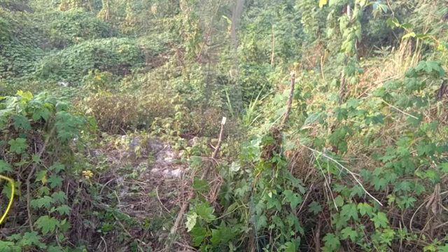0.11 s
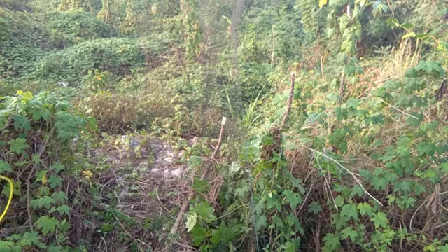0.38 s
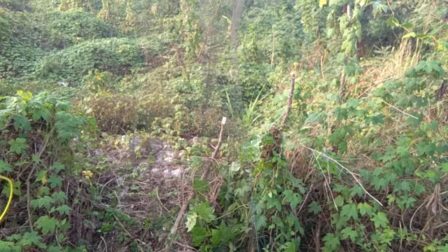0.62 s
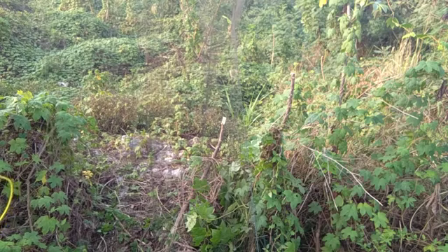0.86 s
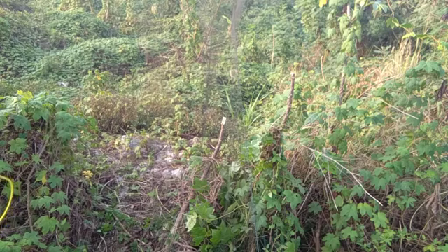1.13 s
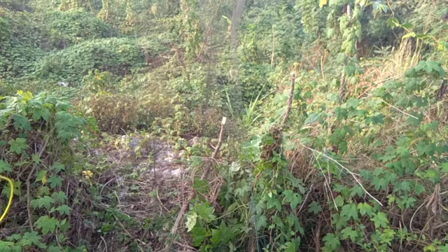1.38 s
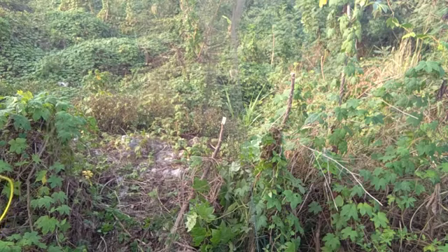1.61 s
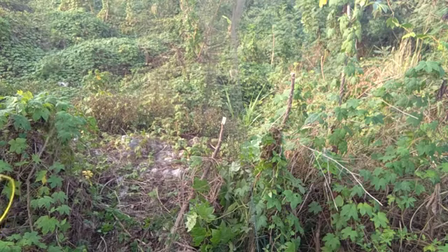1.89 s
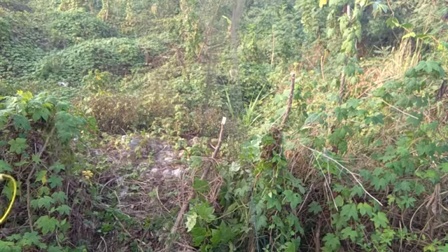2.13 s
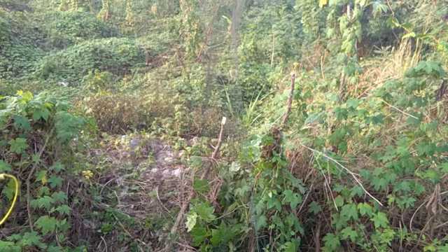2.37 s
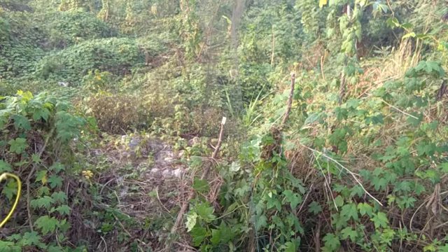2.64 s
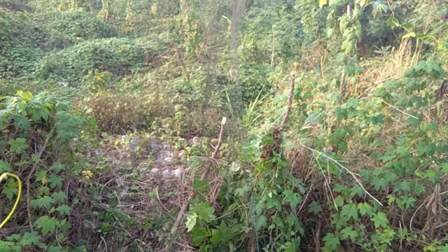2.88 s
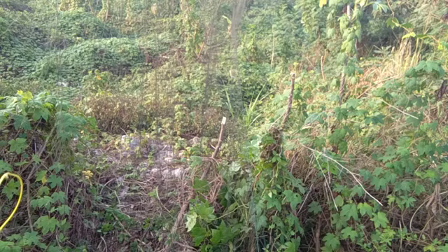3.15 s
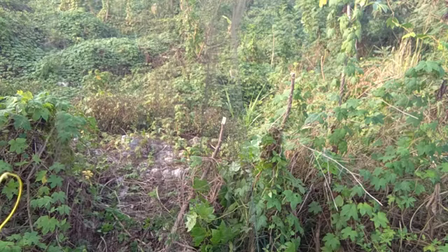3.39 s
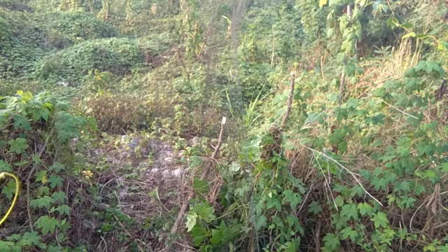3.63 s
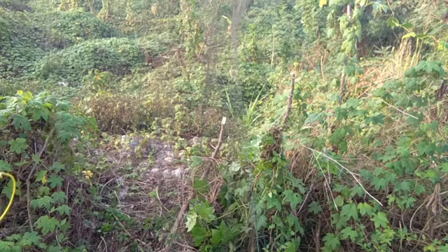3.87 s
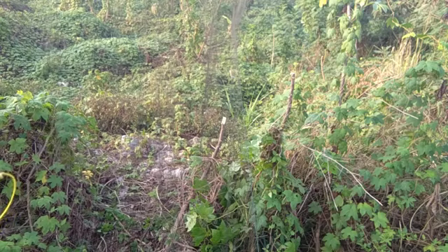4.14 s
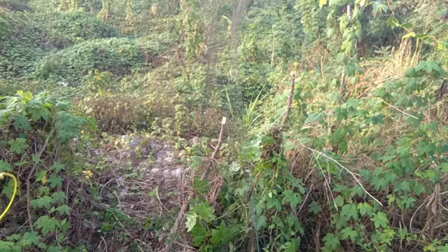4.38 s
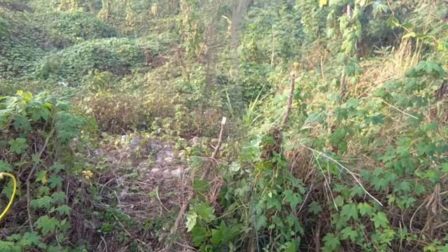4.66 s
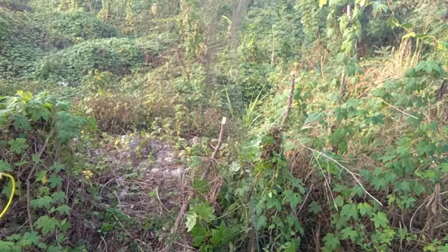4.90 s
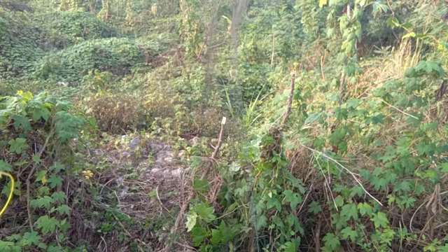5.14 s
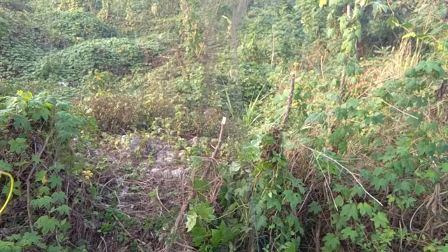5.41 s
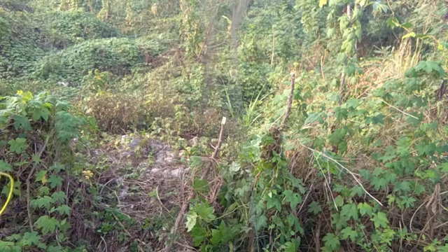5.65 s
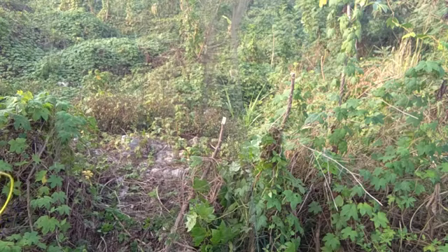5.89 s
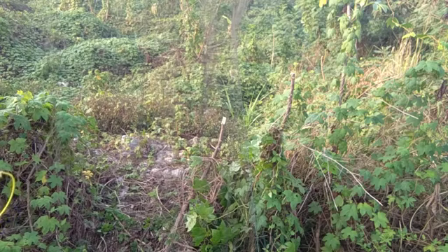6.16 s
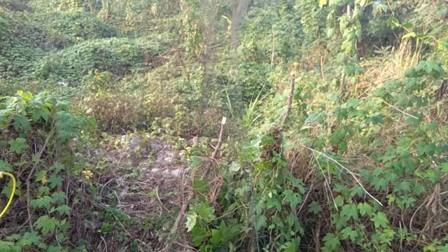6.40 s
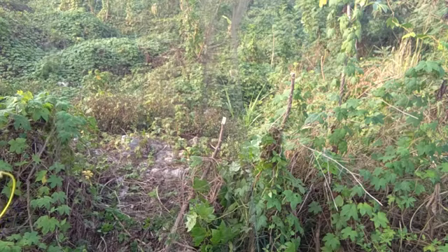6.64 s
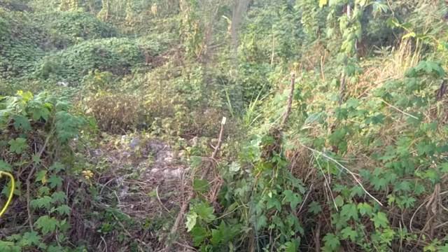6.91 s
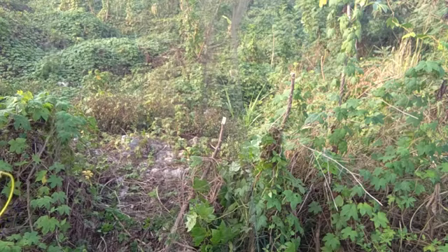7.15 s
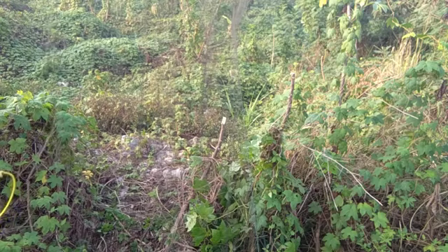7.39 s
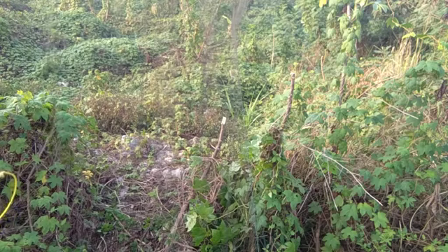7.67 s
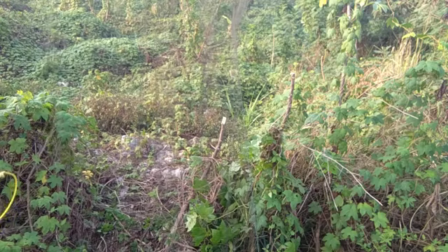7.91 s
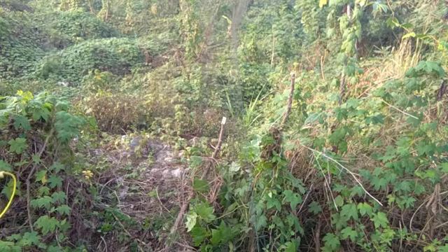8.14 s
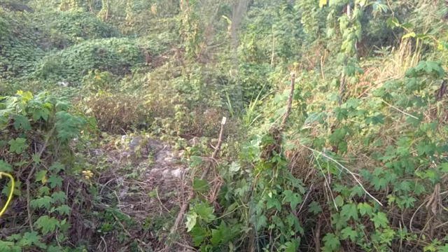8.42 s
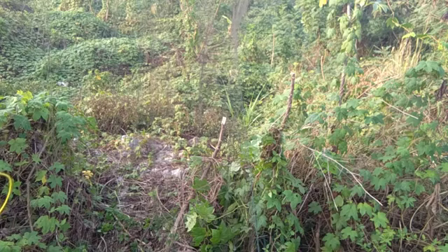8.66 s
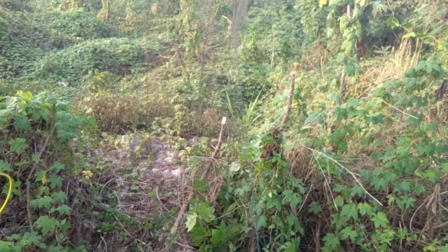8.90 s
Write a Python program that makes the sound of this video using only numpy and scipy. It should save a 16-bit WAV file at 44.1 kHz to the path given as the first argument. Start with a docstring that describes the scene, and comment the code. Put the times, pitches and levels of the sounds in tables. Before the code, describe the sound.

On an overgrown slope, nearby crickets give short rapid chirps around 4 to 5 kHz over a blurred far chorus and a higher pulsing insect. Birds whistle a gliding, warbling phrase, then repeat it; later come quick chips and brighter calls. Soft low rumble and insect hiss lie beneath, with a faint engine near the end. Leaves scatter the sounds; the microphone is slightly dull with faint hiss.

```python
"""An overgrown slope at rest: nine seconds of crickets, insects and small birds over a soft rumble.
From the start near crickets chirp, far ones and two pulsing insects go on behind, and air and distant insects
hiss; birds whistle a phrase and soon repeat it. Before 5 s short bird chips begin; from 6.2 s a distant engine
adds thin lines, and quicker bird calls follow. Singers are gliding sine tones, and leaves scatter them as
dense echoes; the background is coloured noise, and the microphone dulls the treble and adds faint hiss."""
import sys
import numpy as np
from scipy import signal
from scipy.fft import rfft, irfft, next_fast_len
from scipy.io import wavfile

SR = 44100
rng = np.random.default_rng(int(sys.argv[2]) if len(sys.argv) > 2 else 0)


def linear_from_db(decibels):
    """Turn decibels (scalar or array-like) into linear amplitude factors; 0 gives 1."""
    return 10 ** (np.asarray(decibels, float) / 20)


def generate_wav(signal):
    """Clip the signal to [-1, 1] and save it as 16-bit WAV at the path in sys.argv[1]."""
    frames = np.transpose(np.atleast_2d(signal))
    scaled = np.clip(frames, -1, 1) * 32767
    pcm = np.round(scaled).astype(np.int16)
    wavfile.write(sys.argv[1], SR, pcm)


N = 398223  # length [samples]

# two kinds of cricket wing stroke, one swelling to a peak and one even:
# (time from its peak [ms], pitch [Hz], level [dB])
STROKES = [
    [(-14, 5150, -20.5), (-8, 4930, -11), (-4.5, 4790, -6.5), (0, 4670, 1), (4, 4530, -12.5),
     (5.5, 4300, -8.5), (8, 4350, -20.5), (5.5, 4140, -15), (14, 3850, -29.5)],
    [(-13.5, 5600, -26), (-5, 5120, -4.5), (0.5, 4830, 3), (2, 4700, -4), (4, 4675, 4), (5, 4530, -6.5),
     (9, 4450, -4.5), (13, 4250, -26)],
]
# overtones of each kind of stroke: (multiple of the pitch, level [dB])
STROKE_OVERTONES = [
    [(2, -15.5), (3, -16)],
    [(2, -10.5), (3, -16)],
]
# chirps of the nearer crickets, one list for each kind of stroke:
# (first stroke [s], last stroke [s], first level [dB], last level [dB])
NEAR_CHIRPS = [
    [(0.1471, 0.1786, -45, -45), (0.3842, 0.4514, -45, -44.5), (0.5889, 0.6562, -49, -46),
     (0.8606, 0.8606, -42, -41), (1.0625, 1.0625, -40, -38.5), (1.1307, 1.1307, -46, -46),
     (1.1978, 1.1978, -44, -45), (1.2354, 1.2719, -35, -34), (1.4741, 1.5453, -37, -37),
     (1.7340, 1.806, -38.5, -37.5), (2.0064, 2.0774, -39.5, -37.5), (2.2495, 2.3204, -38, -37.5),
     (2.4919, 2.5634, -38, -37.5), (2.7623, 2.8334, -39, -36.5), (4.5315, 4.5689, -43, -44),
     (5.8899, 5.9562, -52, -43), (6.5730, 6.6807, -41.5, -36), (6.7032, 6.7369, -44, -48),
     (6.8505, 6.922, -39, -36.5), (6.9762, 6.9762, -42.5, -43), (7.02, 7.054, -50, -47),
     (7.0886, 7.1591, -37.5, -36.5), (7.2126, 7.246, -46, -50), (7.3277, 7.3979, -38.5, -38.5),
     (7.451, 7.4846, -47, -47), (7.5665, 7.6367, -39, -37.5), (7.717, 7.7853, -47, -43.5),
     (7.9919, 8.0265, -41, -49), (8.2273, 8.2951, -45, -45.5), (8.7734, 8.7734, -44, -44),
     (9.0086, 9.0086, -43.5, -45)],
    [(0.0062, 0.0382, -48, -48), (0.8052, 0.8746, -44, -42.5), (1.0228, 1.0916, -45, -42),
     (1.3065, 1.381, -42.5, -52), (1.4555, 1.5239, -46.5, -41.5), (1.6716, 1.7402, -45, -43),
     (1.9223, 1.9903, -45.5, -41.5), (3.382, 3.4471, -50, -51), (3.589, 3.6521, -51, -49),
     (3.8188, 3.8817, -49.5, -50), (4.04, 4.1067, -50.5, -49.5), (4.2749, 4.3065, -48, -48),
     (4.7361, 4.7677, -46, -49), (4.7528, 4.8226, -44, -43), (4.9732, 5.0725, -42, -46),
     (5.2221, 5.2901, -44, -42.5), (5.4717, 5.539, -44.5, -41.5), (5.6875, 5.788, -46, -42),
     (5.9348, 6.0033, -44.5, -42.5), (6.04, 6.04, -52, -48), (6.1586, 6.1586, -49, -48),
     (6.1848, 6.2532, -45, -41.5), (6.4014, 6.504, -48, -41.5), (8.529, 8.5925, -48, -51),
     (8.7366, 8.7366, -47, -48), (8.7624, 8.8262, -49, -50), (8.9898, 9.0227, -47, -46.5)],
]
STROKE_GAP_S, BASE_CHIRP_GAP_S = .034, .24
# pulses inside a chirp or train come a little stronger and later than those at its ends
INNER_PULSE_DB, INNER_PULSE_LATE_S = 1.26, .0005

# one pulse of the low insect: (time [ms], pitch [Hz], level [dB])
LOW_PULSE_SHAPE = [(-12.5, 5100, -16.5), (-10.5, 3680, -7), (-3.5, 3560, -1), (9.5, 3430, -2.5),
                   (18, 3350, -19)]
# pulse trains of the low insect: (first pulse [s], last pulse [s], first level [dB], last level [dB])
LOW_PULSE_TRAINS = [(0.009, 0.056, -53, -54), (0.114, 0.114, -55, -58), (0.786, 1.017, -64, -66.5),
                    (1.076, 1.129, -70, -59), (3.46, 3.697, -64, -61), (3.758, 3.758, -58, -61),
                    (4.849, 4.893, -71, -63), (5.129, 5.129, -57, -60), (5.194, 5.194, -61, -61),
                    (5.431, 5.431, -61, -64), (8.369, 8.605, -65, -63)]
LOW_GAP_S, FARTHER_LOW_GAP_S, FARTHER_LOW_DB = .047, .0468, -69.0

# phrases of the high insect: (start [s], end [s], level [dB])
HIGH_PHRASES = [(0, .5, -58.5), (.75, 1.4, -58.5), (1.55, 2.55, -58.5), (2.8, 3.25, -59), (3.55, 4.42, -59),
                (4.6, 5.65, -57.5), (5.8, 6.6, -58.5), (6.72, 7.2, -57.5), (7.6, 8.7, -57.5),
                (8.95, 9.03, -61)]
# one pulse of the high insect: (time [ms], pitch [Hz], level [dB])
HIGH_PULSE_SHAPE = [(-20, 7160, -21), (-13, 7150, -3), (1, 7120, -4), (12.5, 7080, 0.5), (19, 7010, -20)]
HIGH_PULSES_PER_S, HIGH_FIRST_S = 16.09, .031

# plain bird glides: (start [s], length [ms], first pitch [Hz], last pitch [Hz], level [dB])
BIRD_GLIDES = [(0.056, 57, 6960, 5070, -46.5), (0.448, 22, 5750, 5050, -56), (0.765, 30, 6450, 6050, -64),
               (1.205, 31, 5650, 5750, -62), (4.07, 28, 3050, 2950, -65), (5.662, 35, 3630, 3080, -64),
               (6.285, 16, 3750, 3650, -62), (6.468, 26, 2840, 2570, -63), (7.712, 21, 1950, 2050, -68),
               (7.968, 24, 3300, 3130, -56), (7.97, 22, 3700, 3500, -53), (7.795, 24, 5200, 4300, -52),
               (6.36, 38, 2860, 2810, -64), (1.425, 22, 6500, 5300, -60), (8.2, 18, 4870, 3900, -56),
               (8.3, 10, 4320, 1810, -63), (8.676, 14, 5550, 5500, -64), (8.885, 32, 1600, 1680, -71),
               (0.562, 32, 6780, 5400, -56), (1.412, 20, 4070, 2900, -61), (1.422, 52, 7020, 5150, -51),
               (1.44, 55, 2940, 2380, -63), (1.512, 28, 5930, 5940, -56), (1.61, 19, 4800, 4050, -52),
               (1.92, 35, 6250, 5600, -55.5), (2.722, 45, 7000, 5270, -50), (3.655, 44, 6030, 5300, -58.5),
               (4.0, 20, 3520, 3120, -61), (4.262, 34, 7260, 5300, -53), (5.005, 35, 7100, 5100, -49),
               (5.385, 37, 6860, 5660, -61), (5.705, 35, 3860, 2830, -65), (5.735, 40, 2860, 2820, -62.5),
               (5.948, 11, 3030, 3950, -61), (5.968, 14, 3740, 2900, -56), (5.997, 43, 3800, 2380, -61),
               (6.045, 72, 3020, 2790, -61.5), (6.33, 38, 3810, 2720, -61.5),
               (6.381, 16.6, 3560, 3220, -49), (7.35, 14.2, 4320, 3500, -55), (7.485, 20, 4270, 3420, -57),
               (7.805, 17, 4570, 2600, -62), (7.905, 9, 4380, 2740, -62), (8.245, 36, 7300, 5600, -54.5),
               (8.652, 26, 2510, 5520, -70), (8.808, 50, 5840, 4980, -58.5), (8.885, 24, 4150, 3680, -65),
               (8.968, 27, 2740, 5850, -62), (8.996, 20, 5850, 5320, -56)]
# how a glide swells and fades: (share of its length, level [dB])
GLIDE_LOUDNESS = [(0, -1), (.3, -0.5), (.62, -4), (1, -9)]
# bird notes that sink and climb again: (start [s], length [ms], lowest pitch [Hz], last pitch [Hz], level [dB])
BIRD_DIPS = [(0.16, 82, 2220, 2700, -61.5), (1.515, 83, 2230, 2700, -59.5), (4.155, 73, 1840, 2685, -63),
             (5.99, 30, 2030, 2160, -67), (6.152, 80, 1920, 2630, -61.5), (7.345, 34, 1700, 2198, -69),
             (7.472, 36, 1920, 2380, -62.5)]
# the course of a sinking note: (share of its length, share of the climb back, level [dB])
DIP_COURSE = [(0.251, .3, -7), (.52, 0, -8.5), (.73, .9, 1), (1, 1, -4)]
DIP_FIRST_PITCH, DIP_FIRST_DB = 1.25, -5  # pitch as a multiple of the last pitch
# recurring bird syllables by name: a shape of (time [ms], pitch [Hz], level [dB]),
# then when it is sung: (start [s], level [dB rms], multiple of the shape's pitch)
BIRD_SYLLABLES = { "warble": ([(0, 3300, -12), (6, 3802, -4), (20.1, 3381, -4), (28.6, 3553, -3),
                  (43, 2967, -14), (55.2, 3400, 0), (64, 3900, -1.5), (73.6, 3640, -4.5),
                  (88.5, 3730, -10)], [(0.272, -53, 1), (1.627, -48.5, 0.99)]), "turn": ([(0, 2750, -16),
                  (19.6, 2400, -9), (39.4, 2284, -14), (41.85, 2752, -6), (46.6, 3206, -0.5),
                  (61.2, 2660, -7.5), (71.6, 1922, -7.5), (90.3, 2652, -13)], [(0.45, -56.5, 1.005),
                  (1.803, -53, .995)]), "two-beat": ([(0, 3645, -18), (16, 3356, 0), (27.3, 3480, -10),
                  (34.1, 2950, -9), (50.2, 2950, -15), (62.1, 3530, -3), (87, 3540, -20)],
                  [(0.589, -51.5, 1.005), (1.945, -49, .995)]), "chip": ([(0, 3452, -2), (7.9, 4102, -1.5),
                  (22, 3778, -6)], [(4.945, -52.5, 0.98), (5.268, -46, 0.97), (8.643, -53, .96)]),
                  "chup": ([(0, 3880, -1), (11, 3570, -4.5), (23.2, 3380, -9)], [(4.974, -49, 0.99),
                  (5.298, -42.5, 0.99), (8.671, -48.5, 1.01)]), "plunge": ([(0, 4400, 0), (13.24, 3620, -2),
                  (22.7, 2745, -17), (35, 2570, -5)], [(5.015, -51.5, 1), (5.34, -52, 0.99),
                  (8.712, -57, .99)]), "sigh": ([(0, 3250, -14), (18, 2978, 2), (35, 2720, -10)],
                  [(5.088, -58, 1.02), (5.42, -61.5, .98), (8.785, -61, 1.01)]), "flick": ([(0, 2342, -17),
                  (5, 3430, -1), (15.1, 3092, -0.5), (27, 3118, -10), (52, 3250, -15)], [(6.665, -51, .95),
                  (6.993, -44.5, 1.005)]), "quaver": ([(0, 2700, -28), (5, 3452, -1.5), (13, 3202, -11),
                  (20.8, 3379, -4), (35, 3050, -3.5), (47.4, 2858, -3), (53.2, 3068, -6), (66.4, 2800, -7),
                  (82, 2898, -14), (101, 2887, -25)], [(6.721, -41, .98), (7.049, -39, 1.005)]),
                  "hook": ([(0, 2788, -4), (12, 2960, -6), (25.1, 2642, -13), (33, 1884, -11),
                  (42, 2453, -2), (60, 2572, -9), (75.6, 2543, 1), (88, 2769, -9), (110, 2649, -34)],
                  [(6.833, -46, .995), (7.165, -42.5, 1.005)]), "upper seep": ([(0, 6319, 1), (6, 7066, -2),
                  (16.9, 6820, -5), (28, 6249, -6)], [(6.762, -48.5, 1.005), (7.984, -46.5, .995)]),
                  "lower seep": ([(0, 5158, -12), (7, 6047, 0), (20.6, 5700, -0.5), (35.1, 5168, -6),
                  (60, 4247, -12)], [(6.765, -46, 1.015), (7.987, -45, .985)]), "drop": ([(0, 3250, -1),
                  (4, 4199, -4), (13.8, 3379, -7), (24, 3270, -8), (43.6, 3298, -1)], [(7.607, -56, .97),
                  (8.007, -40.5, 1.005)]), "settle": ([(0, 3700, -6), (3, 3952, 0), (15.1, 3388, -1),
                  (27, 3262, -7), (46, 3360, -8), (64, 3370, -20)], [(7.655, -53.5, 1.005),
                  (8.054, -41.5, .995)]), "whip": ([(0, 2800, -26), (5, 4600, -6), (11, 4970, -16),
                  (20.8, 4110, -2.5), (34, 4150, -1), (44, 2511, -26)], [(7.73, -42.5, .995),
                  (8.129, -37.5, 1.005)]), "murmur": ([(0, 2350, -5), (14, 2650, -1), (30, 2450, -6),
                  (46, 2300, -8)], [(7.772, -66, 1.005), (8.172, -60.5, .995)]), "rise": ([(0, 2278, -20),
                  (15, 2810, -6.5), (30, 3051, 0), (41.5, 3145, -2), (62.4, 3092, -16), (86, 3050, -29)],
                  [(7.862, -48, 1.005), (8.256, -43.5, .995)]), }

# loudness of the far crickets together: (time [s], level [dB rms])
FAR_CRICKET_LEVEL = [(0.0, -56), (3.34, -58.5), (6.89, -56.5), (9.03, -56.5)]
FAR_SINGERS = 11

# echoes: time to fade by 60 dB [s] and level beside the sound that caused them [dB]
LEAVES_T60_S, LEAVES_DB = 0.55, -11.5
GRASS_T60_S, GRASS_DB = 0.038, -8.5
TWIGS_T60_S, TWIGS_DB = 0.12, -3
BANK_T60_S, BANK_DB, BANK_DELAY_S = 0.1, -14.5, .042

# a distant engine gaining speed: (time [s], firing rate [Hz], level [dB])
ENGINE_SPEED = [(6.2, 88.2, -77), (7.0, 92, -70), (7.6, 92.9, -68.5), (8.3, 96.6, -76.5), (9.03, 98.3, -70)]
# the engine lines heard: (multiple of the firing rate, level [dB])
ENGINE_LINES = [(4, 1), (5, -1.8), (6, -1.7)]
# far traffic and air: (frequency [Hz], level [dB per Hz])
RUMBLE_SPECTRUM = [(15, -61), (25, -45), (46, -11.5), (96, -2), (178, -2.5), (289, -7.5), (395, -10),
                   (947, -21.5), (1370, -24.5), (1730, -26.5), (2600, -29), (3380, -49), (5720, -120)]
# distant insects blurred to a hiss: (frequency [Hz], level [dB per Hz])
HISS_SPECTRUM = [(1800, -33), (2600, -10.5), (3500, -2.5), (4050, -13.5), (4700, 3.5), (5600, -8.5),
                 (6100, -2), (6500, -7.5), (7000, 5.5), (7400, -7), (8000, -32)]
RUMBLE_DB, HISS_DB = -53.5, -63  # usual levels, which drift
# a faint wavering band of tone: (frequency [Hz], level [dB per Hz])
WHINE_SPECTRUM = [(1250, -14), (1320, -1), (1390, -2.5), (1460, -15)]
# how that band comes and goes: (time [s], usual level [dB rms])
WHINE_LOUDNESS = [(0, -70), (1.4, -72), (1.8, -99), (2.9, -81), (3.1, -74), (3.7, -75), (4.0, -95)]

# the microphone's own hiss: (frequency [Hz], level [dB per Hz])
MIC_HISS_SPECTRUM = [(6000, -10.5), (7600, 3), (8300, -0.5), (10000, -5), (12000, -8.5), (14000, -6.5),
                     (15600, -2)]
MIC_HISS_DB, MIC_CUT_HZ, MIC_LEAK_DB = -83, 7430, -29.5


def near_crickets():
    """Wing strokes in chirps ring with overtones; stems around the crickets blur each stroke."""
    crickets = np.zeros(N)
    for chirps, shape, overtones in zip(NEAR_CHIRPS, STROKES, STROKE_OVERTONES):
        crickets += pulses(trains(chirps, STROKE_GAP_S), shape, 0.0045, overtones)
    return crickets + linear_from_db(GRASS_DB) * leaves(crickets, t60=GRASS_T60_S)


def birds():
    """Gliding whistles, a little unsteady; twigs scatter them and the bank sends a blurred echo."""
    direct, hidden = np.zeros(N), np.zeros(N)
    waver = 0.011 * drift(150)
    for note in bird_notes():
        rows = np.array(note) + [0, 0, 3]  # a sine peaks 3 dB above its rms
        add_tone(direct, rows, 0, waver=waver)
        # a quiet bird sits deeper in the thicket, so more of it arrives scattered
        extra_loss = .45 * max(rows[:, 2].max() + 52, 0)
        add_tone(hidden, rows - [0, 0, extra_loss], 0, waver=waver)
    twigs = leaves(hidden, t60=TWIGS_T60_S)
    bank = np.roll(leaves(direct, t60=BANK_T60_S), int(BANK_DELAY_S * SR))
    fluttering = direct * linear_from_db(1.2 * drift(70))
    return fluttering + linear_from_db(TWIGS_DB) * twigs + linear_from_db(BANK_DB) * bank


def bird_notes():
    """Bends each kind of note into a path of pitch and loudness: rows (time [s], pitch [Hz], level [dB rms])."""
    notes = []
    along, swell = np.transpose(GLIDE_LOUDNESS)
    for start, ms, first, last, db in BIRD_GLIDES:
        pitch = first * (last / first) ** along
        notes.append(np.transpose([start + along * ms / 1000, pitch, db + swell]))

    along, climb, swell = np.transpose(DIP_COURSE)
    for start, ms, low, last, db in BIRD_DIPS:
        opening = [start, DIP_FIRST_PITCH * last, db + DIP_FIRST_DB]
        rest = np.transpose([start + along * ms / 1000, low + climb * (last - low), db + swell])
        notes.append(np.vstack([opening, rest]))

    for shape, sung in BIRD_SYLLABLES.values():
        ms, hz, swell = np.transpose(shape)
        for start, db, pitch in sung:
            notes.append(np.transpose([start + ms / 1000, pitch * hz, db + swell]))
    return notes


def low_insects():
    """Falling pulses in even trains, while another low insect pulses on without pause, far off."""
    farther = [(s, FARTHER_LOW_DB) for s in np.arange(0, N / SR, FARTHER_LOW_GAP_S)]
    return pulses(trains(LOW_PULSE_TRAINS, LOW_GAP_S) + farther, LOW_PULSE_SHAPE, detune=0.0046)


def high_insect():
    """An even train of short whistles in phrases, fluttering in strength."""
    beat = np.arange(HIGH_FIRST_S, N / SR, 1 / HIGH_PULSES_PER_S)
    train = [(s, db) for start, end, db in HIGH_PHRASES for s in beat if start < s < end]
    return pulses(train, HIGH_PULSE_SHAPE, detune=0.0027) * linear_from_db(2.0 * drift(70))


def far_crickets():
    """Each singer repeats chirps of four swelling strokes at its own tempo and distance; leaves blur them."""
    events = []
    for start, tempo, far in rng.random((FAR_SINGERS, 3)):
        chirp_gap = BASE_CHIRP_GAP_S * (.9 + .25 * tempo)
        for chirp in np.arange(start - 1, 40) * chirp_gap:
            for k in range(4):
                events.append((chirp + k * STROKE_GAP_S, -8.0 * far - 2.0 * (3 - k)))
    events = [event for event in events if 0 < event[0] < N / SR]
    chorus = pulses(events, STROKES[0], detune=0.0147)
    blurred = chorus + linear_from_db(2.5) * leaves(chorus)
    return linear_from_db(in_time(FAR_CRICKET_LEVEL)) * rms_one(blurred)


def far_engine():
    """A few multiples of the engine's firing rate, slowly rising and drifting in strength."""
    s, hz, db = np.transpose(ENGINE_SPEED)
    engine = np.zeros(N)
    for multiple, line_db in ENGINE_LINES:
        add_tone(engine, np.transpose([s, multiple * hz, db + line_db]), 0)
    return engine * linear_from_db(5.1 * drift(2.8))


def background():
    """Noise shaped into a rumble, an insect hiss and a faint whine, each drifting in level."""
    rumble = linear_from_db(RUMBLE_DB + 0.46 * drift(2.3)) * coloured(RUMBLE_SPECTRUM)
    hiss = linear_from_db(HISS_DB + 0.94 * drift(4.1)) * coloured(HISS_SPECTRUM)
    whine = linear_from_db(in_time(WHINE_LOUDNESS) + 2.0 * drift(5)) * coloured(WHINE_SPECTRUM)
    return rumble + hiss + whine


def leaves(x, t60=LEAVES_T60_S):
    """Scattering in the thicket: a dense tail of echoes of unit energy, broken up by moving leaves."""
    t = np.arange(SR // 2) / SR
    onset = np.clip(t / 0.0047, 0, 1)
    tail = rng.standard_normal(len(t)) * linear_from_db(-60 * t / t60) * onset
    tail = tail / np.sqrt(np.sum(tail ** 2))
    stirred = rms_one(.6 + drift(160))
    return signal.fftconvolve(x * stirred, tail)[:N]


def trains(rows, gap_s):
    """Spaces pulses (time [s], level [dB]) about evenly from the first to the last of each train."""
    events = []
    for first, last, first_db, last_db in rows:
        along = np.linspace(0, 1, 1 + round((last - first) / gap_s))
        inside = (along > 0) & (along < 1)
        times = first + along * (last - first) + INNER_PULSE_LATE_S * inside
        levels = first_db + along * (last_db - first_db) + INNER_PULSE_DB * inside
        events += zip(times, levels)
    return events


def pulses(events, shape, detune, overtones=()):
    """Plays one pulse shape at each (time [s], level [dB]), each a little off in pitch."""
    out = np.zeros(N)
    ms, hz, db = np.transpose(shape)
    chances = rng.standard_normal((len(events), 2))
    for (s, level_db), (off, turn) in zip(events, chances):
        rows = np.transpose([s + ms / 1000, hz * (1 + detune * off), db + level_db])
        add_tone(out, rows, turn, overtones)
    return out


def add_tone(out, rows, turn, overtones=(), waver=np.zeros(N)):
    """Adds a gliding sine through rows (time [s], pitch [Hz], peak level [dB]), starting at a turn of phase."""
    s, hz, db = np.transpose(rows)
    at = np.arange(max(int(s[0] * SR), 0), min(int(s[-1] * SR), N))
    t = at / SR
    pitch = np.interp(t, s, hz) * (1 + waver[at])
    phase = 2 * np.pi * (turn + np.cumsum(pitch) / SR)
    ends = np.clip(np.minimum(t - s[0], s[-1] - t) / .003, 0, 1)  # 3 ms ramps
    level = np.interp(t, s, db)
    tone = linear_from_db(level) * np.sin(phase)
    # overtones bypass the wing's resonance and swell less
    even = db.max() + 0.4 * (level - db.max())
    for multiple, overtone_db in overtones:
        tone += linear_from_db(even + overtone_db) * np.sin(multiple * phase)
    out[at] += ends * tone


def coloured(spectrum):
    """Steady noise filtered to the given spectrum, rms 1."""
    hz, db = np.transpose(spectrum)
    size = next_fast_len(N)
    grid = np.maximum(np.fft.rfftfreq(size, 1 / SR), 1)
    gain = linear_from_db(np.interp(np.log(grid), np.log(hz), db, left=-80, right=-80))
    noise = rng.standard_normal(size)
    return rms_one(irfft(rfft(noise) * gain, size)[:N])


def drift(rate, size=N):
    """Random wandering of rms 1: noise smoothed by a double low-pass at the rate [Hz]."""
    r = np.exp(-2 * np.pi * rate / SR)
    noise = rng.standard_normal(size + 9000)  # the first 9000 samples let the filter settle
    return rms_one(signal.lfilter([1], [1, -2 * r, r * r], noise)[9000:])


def in_time(rows):
    """Reads a curve (time [s], value) at every sample by straight lines."""
    return np.interp(np.arange(N) / SR, *np.transpose(rows))


def rms_one(x):
    """Scales a signal to rms 1."""
    return x / np.sqrt(np.mean(x ** 2) + 1e-20)


def scene():
    """Adds the near singers and their echoes to the far sounds, the same in both channels."""
    near = near_crickets() + birds() + low_insects() + high_insect()
    far = far_crickets() + far_engine() + background()
    return np.tile(near + linear_from_db(LEAVES_DB) * leaves(near) + far, (2, 1))


def band_limit(x):
    """A steep low-pass at the top of the band."""
    return signal.sosfilt(signal.butter(12, 15530, fs=SR, output="sos"), x)


def record(dry):
    """The microphone path drops steeply above 7 kHz, leaks a little treble and adds its own faint hiss."""
    low_pass = signal.ellip(6, .5, 45, MIC_CUT_HZ, fs=SR, output="sos")
    cut = signal.sosfilt(low_pass, dry)
    leak = linear_from_db(MIC_LEAK_DB)
    mix = (1 - leak) * cut + leak * dry + linear_from_db(MIC_HISS_DB) * coloured(MIC_HISS_SPECTRUM)
    return band_limit(mix)


dry = scene()
out = record(dry)
generate_wav(out)
```